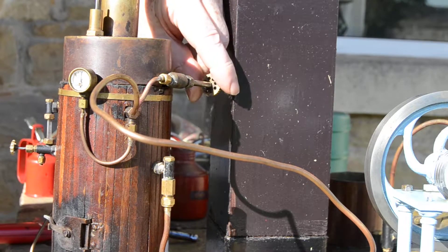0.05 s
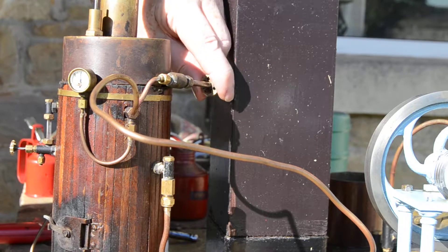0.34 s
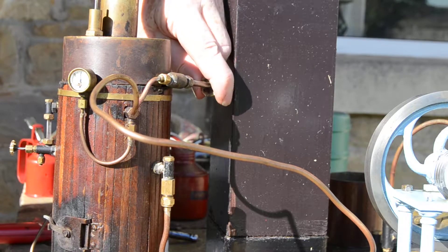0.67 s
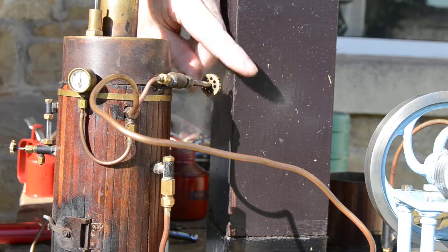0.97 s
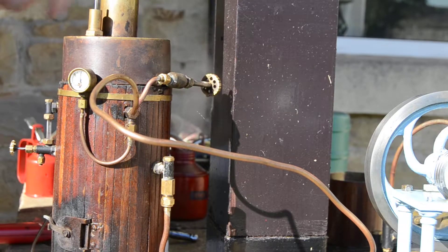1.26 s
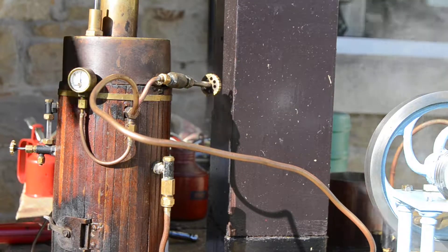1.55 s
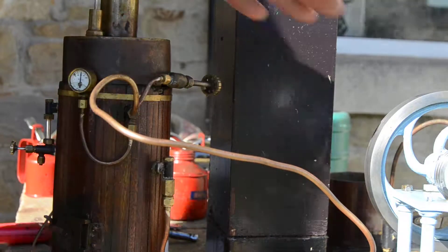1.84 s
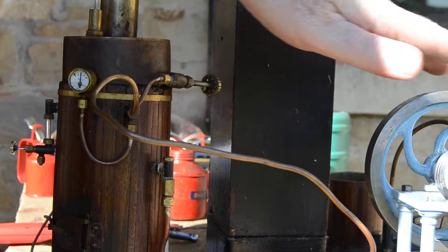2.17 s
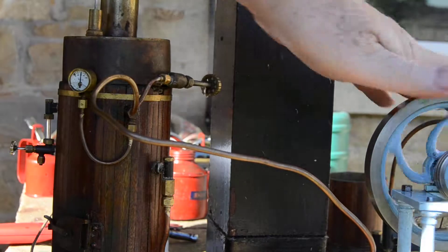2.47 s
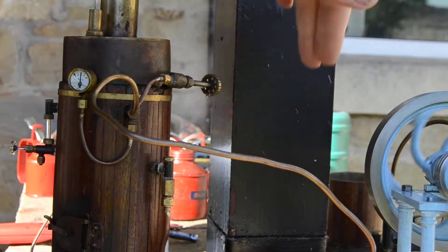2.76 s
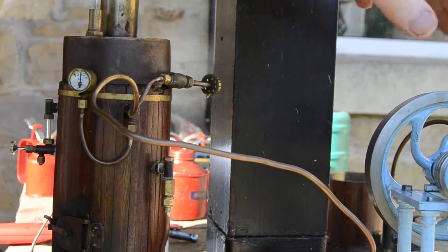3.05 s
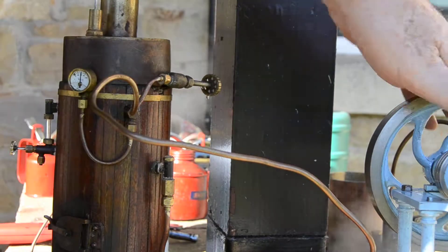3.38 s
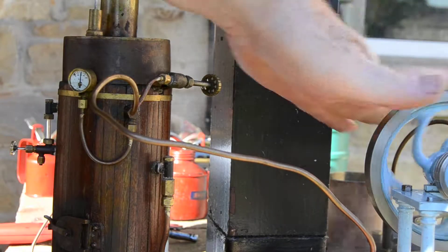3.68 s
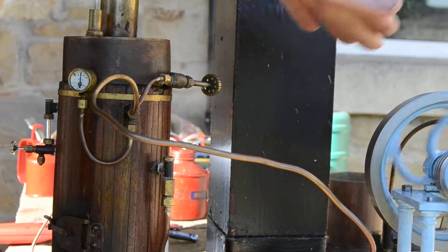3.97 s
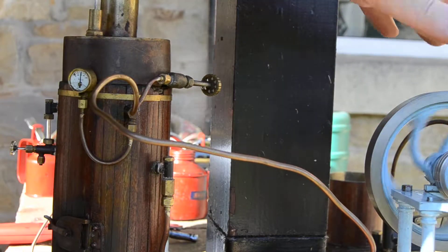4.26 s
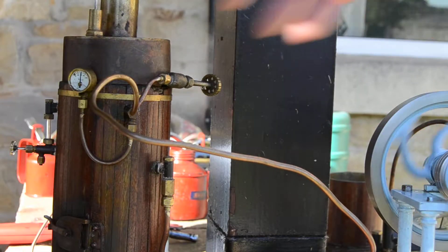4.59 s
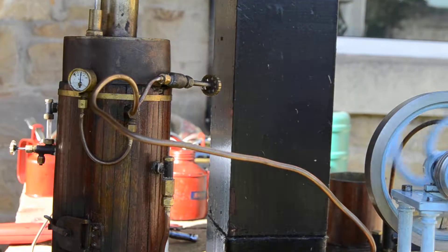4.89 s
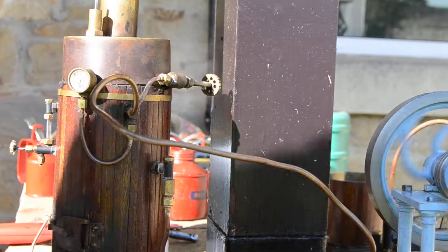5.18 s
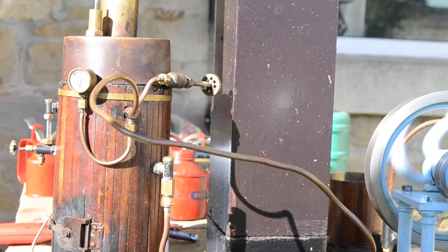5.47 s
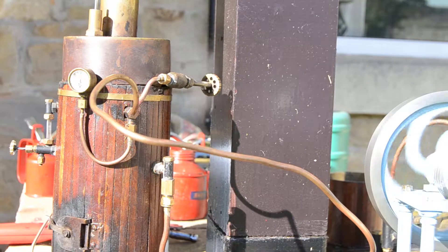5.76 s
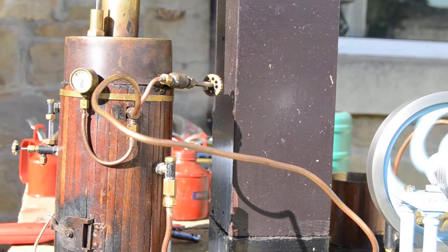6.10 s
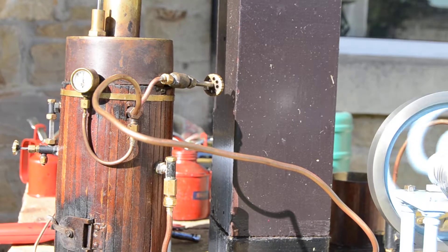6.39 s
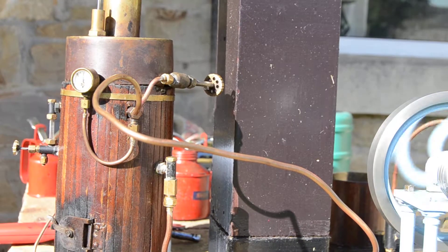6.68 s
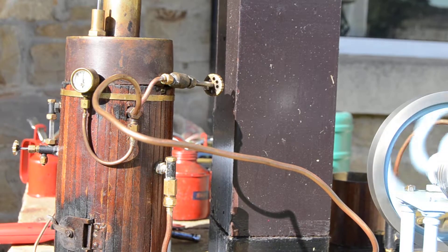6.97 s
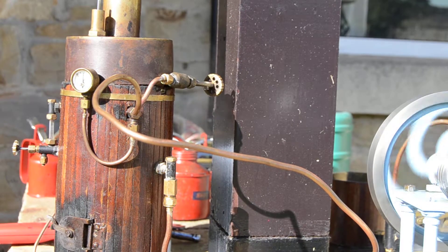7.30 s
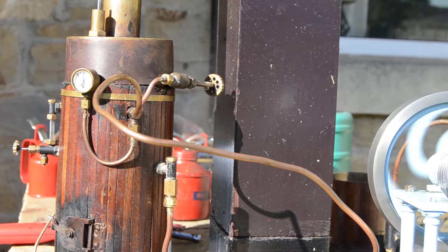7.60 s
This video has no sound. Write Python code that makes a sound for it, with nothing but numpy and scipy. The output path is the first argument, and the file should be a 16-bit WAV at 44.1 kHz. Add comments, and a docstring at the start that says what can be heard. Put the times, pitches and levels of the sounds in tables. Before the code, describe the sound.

Steam hisses from a small boiler valve, then a model steam engine gives two slow chuffs and speeds into quick, wet, spitting chuffing.

```python
"""A yard with a model steam engine, its gas burner hissing under a few low gusts of wind.
The valve squeaks open and wet steam blows through the standing cylinder. Two pushes on the flywheel
give two slow chuffs, then the engine picks up to about six turns a second, two chuffs a turn.
Each chuff is a puff of steam coloured by the exhaust pipe, where condensed water gurgles and spits."""
import sys
import numpy as np
from scipy import signal
from scipy.fft import rfft, irfft
from scipy.io import wavfile

SR = 44100
rng = np.random.default_rng(int(sys.argv[2]) if len(sys.argv) > 2 else 0)


def unload_audio(sound):
    """Save the sound as a 16-bit wav file, at the path given as the first command line argument."""
    columns = np.transpose(np.atleast_2d(sound))
    # keep every value between -1 and 1, then stretch to whole-number steps
    steps = np.round(np.clip(columns, -1, 1) * 32767)
    wavfile.write(sys.argv[1], SR, steps.astype(np.int16))


N = 345744
TIME = np.arange(N) / SR
EDGE_HZ = 11050  # top of the scene's band
CRACK_S, OPEN_S, SHUT_S = 0.561, 0.688, 2.522  # valve cracked, valve wide open, port shut by the wheel
STALL_S, START_S = 2.85, 3.68  # the engine stalls after the first push and starts on the second
CRUISE = 6  # turns a second

# tone of the wind, burner, gland leak, blow-through, spits and chuffs: f/Hz, level/dB
WIND_EQ = [(15, -14), (33, -4), (70, -3.5), (120, 0), (300, -2), (600, -2), (2000, -80)]
BURNER_EQ = [(20, -50), (60, -14), (130, -10.5), (230, -2), (1300, -3.5), (3000, -7), (6000, -6.5),
             (9000, -16.5), (11600, -3.5)]
LEAK_EQ = [(60, -28), (200, -17), (450, -1), (800, -12.5), (1300, -3), (2400, 1.5), (7400, -2), (9300, 2.5),
           (11400, -11)]
BLOW_EQ = [(60, -47), (200, -32), (420, -20), (900, -10.5), (2000, -7), (3500, -3.5), (5000, 3.5),
           (7500, 9), (10300, 0.5), (11500, 0.5)]
SPIT_EQ = [(60, -23), (200, -16), (450, -8.5), (900, -1), (2000, -1), (3200, 5), (4700, 6), (7000, 9),
           (9000, 5), (10300, -0.5), (11500, -0.5)]
CHUFF_EQ = [(60, -29), (150, -15), (330, 0.5), (640, 0.5), (1100, 5.5), (2000, 1), (4000, 3.5), (7500, 8.5),
            (10300, 1.5), (11500, -3)]
# peaks and notches on the burner and leak, in the exhaust pipe, on slow chuffs: f/Hz, width/Hz, gain/dB
FLUE_BANDS = [(1410, 200, 4.5), (2150, 560, 2), (3900, 350, -0.5), (4460, 480, 3.5), (7950, 420, -2.5),
              (9200, 900, 2)]
PIPE_BANDS = [(515, 103, 5.5), (1127, 490, 5), (2020, 580, 10), (2730, 425, 6.5), (3633, 554, 9),
              (4640, 900, 8.5), (5470, 380, 6), (6070, 200, 6), (6855, 500, 8.5), (8880, 160, -3.5),
              (8695, 510, 6.5), (9670, 540, 7.5), (10220, 310, 10)]
HOLLOW_BANDS = [(600, 250, 0), (1640, 180, -2.5), (4900, 280, -5), (6400, 240, -10), (10000, 500, -7)]
# ringing modes of the engine's metal: f/Hz
METAL_MODES = [843, 2039, 2274, 2735, 2957, 3544, 4248, 4608, 4886, 5102, 5564, 6821]
# peaks of the gusts: t/s, half width/s, level/dB
GUSTS = [(5.2, 0.27, -70), (5.77, 0.13, -70), (5.92, 0.041, -58), (6.11, 0.064, -57), (6.2, 1.5, -73)]
# water churning in the running engine: t/s, level/dB
CHURN_LEVEL = [(3.7, -64.5), (5.2, -54), (6, -59.5), (7.2, -54.5), (7.84, -77)]
# short watery splutters, plus one faint held tone near 1300 Hz: t/s, length/s, level/dB, f/Hz, width/Hz
SPLUTTERS_AND_TONE = [(0.708, 0.051, -43.5, 1600, 2200), (0.876, .012, -42, 4230, 1500),
                      (.925, .018, -46.5, 4500, 1400), (0.955, 0.022, -46, 3860, 1400),
                      (1.861, 0.0025, -38, 1900, 2200), (1.859, 0.055, -41.5, 1780, 1100),
                      (1.877, 0.026, -40.5, 4300, 1500), (2.183, 0.026, -48.5, 430, 690),
                      (2.246, 0.092, -46, 3640, 900), (2.427, 0.054, -48.5, 1010, 700),
                      (2.442, 0.079, -47.5, 1920, 700), (4.706, 0.014, -46, 2620, 300),
                      (5.103, 0.017, -42, 2070, 800), (5.246, 0.03, -45.5, 930, 700),
                      (5.436, .025, -47.5, 2000, 700), (5.508, 0.067, -45, 1020, 400),
                      (6.555, 0.028, -40.5, 960, 1300), (6.615, 0.035, -55, 527, 130),
                      (6.75, 0.039, -46.5, 740, 650), (6.82, 0.48, -61, 1301, 150),
                      (7.316, 0.031, -50, 517, 100), (7.327, .025, -38.5, 2930, 400)]
# slugs of water spat from the exhaust: t/s, length/s, level/dB
SPITS = [(3.82, .001, -41), (3.827, 0.0081, -37.5), (4.188, 0.0081, -43), (4.27, 0.0017, -32.5),
         (4.339, 0.0037, -41), (4.55, 0.0051, -31), (4.711, 0.006, -31), (4.785, 0.0013, -31),
         (4.936, 0.017, -31), (5.141, 0.012, -29.5), (5.192, .001, -39), (5.239, 0.0027, -39),
         (5.253, 0.0032, -35.5), (5.355, 0.0069, -28), (5.535, .002, -45), (5.558, 0.013, -32.5),
         (5.589, .001, -33.5), (5.738, 0.0069, -32), (5.781, 0.00088, -35), (5.943, 0.0061, -29.5),
         (6.002, 0.002, -35.5), (6.111, 0.012, -28), (6.309, 0.0077, -29), (6.472, 0.0082, -24),
         (6.513, .001, -33), (6.649, 0.026, -26.5), (6.835, 0.0031, -29.5), (7.164, 0.014, -28.5),
         (7.326, .015, -26), (7.494, 0.012, -32)]
# bright hiss of the blow-through, sagging where water chokes the pipe: t/s, level/dB
HISS_LEVEL = [(.7, -51), (.8, -49.5), (.9, -45), (1.2, -42), (1.5, -42), (1.75, -41.5), (2.0, -41.5),
              (2.24, -42.3), (2.32, -44.5), (2.42, -40.5), (2.52, -45.5)]
# one slow chuff for each push of the flywheel: t/s, length/s, level/dB
PUSHES = [(2.766, 0.097, -30.8), (3.694, 0.078, -32.5)]
# return chuffs that water in the cold cylinder holds back until they burst out: t/s, level/dB
WET_CHUFFS = [(3.945, -34.5), (4.27, -45.5), (4.545, -35), (4.777, -36), (5, -36), (5.433, -40),
              (5.818, -38), (5.999, -35.5)]
# run-up of the crank: t/s, speed/(turns a second)
CRANK_SPEED = [(3.693, 2.093), (4.2, 3.268), (4.7, 4.199), (5.3, 4.929), (6.3, 5.59), (7.84, 6.365)]


def amp(db):
    return 10 ** (np.asarray(db) / 20)


def unit_rms(x):
    return x / np.sqrt(np.mean(x ** 2) + 1e-20)


def follow(curve):
    """A breakpoint curve at every sample."""
    return np.interp(TIME, *np.transpose(curve))


def add(mix, s, sound):
    """Lays a sound into the mix at s seconds."""
    part = mix[max(round(s * SR), 0):][:len(sound)]
    part += sound[:len(part)]


def held(start, stop, rise, fall, t=TIME):
    """Attack, hold and release of a steady flow, in seconds."""
    attack = np.sin(np.pi / 2 * np.clip((t - start) / rise, 0, 1)) ** 2
    return attack * np.exp(-np.maximum(t - stop, 0) / fall)


def puff(length, rise, fall):
    """One-shot envelope: a port opens, stays open, and the pressure dies away."""
    return held(0, length, rise, fall, TIME[:SR // 4])


def wander(rate_hz):
    """Smooth random modulation at unit rms."""
    hz = np.fft.rfftfreq(N, 1 / SR)
    return unit_rms(irfft(rfft(rng.standard_normal(N)) * np.exp(-(hz / rate_hz) ** 2), N))


def colour(x, eq, bands=(), depth=1, size=4096):
    """Minimum-phase EQ of unit in-band power: a smooth curve plus peaks and notches."""
    hz = abs(np.fft.fftfreq(size, 1 / SR))
    eq_hz, eq_db = np.transpose(eq)
    db = np.interp(np.log(hz + 1), np.log(eq_hz), eq_db)
    for centre, width, gain in bands:
        db += depth * gain / (1 + (2 * (hz - centre) / width) ** 4)
    response = np.exp(np.conj(signal.hilbert(np.log(amp(db)))))
    band_rms = np.sqrt(np.mean(amp(db) ** 2 * (hz < EDGE_HZ)))
    return signal.oaconvolve(x, np.fft.ifft(response).real / band_rms)[:len(x)]


def tilt(x, slope_db, pivot_hz=5000):
    """Brightens or dulls by slope_db an octave above 500 Hz."""
    hz = np.fft.rfftfreq(len(x), 1 / SR)
    return irfft(rfft(x) * amp(slope_db * np.log2(np.maximum(hz, 500) / pivot_hz)), len(x))


def resonate(x, hz, width_hz):
    """A steep resonance at unit rms; its pitch may glide."""
    carrier = np.exp(2j * np.pi * np.cumsum(hz * np.ones(len(x))) / SR)
    pole = np.exp(-np.pi * width_hz / SR)
    baseband = signal.lfilter([1], [1, -2 * pole, pole * pole], np.gradient(x) / carrier)
    return unit_rms((carrier * baseband).real)


def swirl(x, patch_db, patch_hz, patch_s, size=512):
    """Moving water keeps shifting a jet's colour, in patches of time and frequency."""
    hop = size // 4
    frames = signal.stft(x, SR, nperseg=size, noverlap=size - hop)[2]
    across = np.fft.fftfreq(len(frames), SR / size)[:, None]
    along = np.fft.fftfreq(frames.shape[1], hop / SR)
    blur = np.exp(-(across * patch_hz) ** 2 - (along * patch_s) ** 2)
    patches = unit_rms(np.fft.ifft2(np.fft.fft2(rng.standard_normal(frames.shape)) * blur).real)
    frames *= amp(patch_db * patches)
    return unit_rms(signal.istft(frames, SR, nperseg=size, noverlap=size - hop)[1][:N])


def wet_steam(flutter_db, flutter_hz, drops_db, drops_per_s):
    """A fluttering jet that carries bursting droplets."""
    jet = rng.standard_normal(N) * amp(flutter_db * wander(flutter_hz))
    drops = rng.standard_normal(N) * (rng.random(N) < drops_per_s / SR)
    return unit_rms(unit_rms(jet) + amp(drops_db) * unit_rms(drops))


def speed_at(s):
    """Crank turns a second; zero before the run-up."""
    return np.interp(s, *np.transpose(CRANK_SPEED), left=0)


def crank_turns():
    """Start time and speed of each turn."""
    turned = np.cumsum(speed_at(TIME)) / SR
    starts = TIME[np.searchsorted(turned, np.arange(np.ceil(turned[-1])), side="right")]
    return list(zip(starts, speed_at(starts)))


def wind(breeze_db=-99):
    """A bed of lumpy low rumble that swells with each gust."""
    lumps = unit_rms(rng.standard_normal(N) * amp(2 * wander(8.4)))
    gusts = sum(amp(db) * np.exp(-((TIME - s) / width) ** 2) for s, width, db in GUSTS)
    return (amp(breeze_db) + gusts) * colour(lumps, WIND_EQ)


def yard_echoes(x, t60=0.14, echoes_per_s=2000):
    """Short, sparse reflections off the bench and the walls."""
    t = TIME[:SR // 2]
    taps = rng.choice([-1, 1], len(t)) * (rng.random(len(t)) < echoes_per_s / SR)
    taps = taps * (t > .004) * amp(-60 * t / t60)
    return signal.oaconvolve(x, taps / np.linalg.norm(taps))[:N]


def metal_ring(x, t60=.13):
    """The exhaust sets the engine's metal ringing."""
    t = TIME[:SR // 4]
    modes = amp(-60 * t / t60) * sum(np.sin(2 * np.pi * hz * t) for hz in METAL_MODES)
    return signal.oaconvolve(x, modes / np.linalg.norm(modes))[:N]


def burner(level_db=-57.5):
    """The steady breath of the gas flame."""
    return amp(level_db) * colour(rng.standard_normal(N), BURNER_EQ, FLUE_BANDS + [(7700, 1600, -3)])


def gland_leak(idle_db=-58.5, open_db=-52.5, blowing_db=-55, stalled_db=-48, running_db=-54.5):
    """Thin hiss from the glands, strongest as pressure builds behind the stalled piston."""
    hiss = swirl(rng.standard_normal(N), patch_db=1.5, patch_hz=400, patch_s=0.061)
    flows = [amp(idle_db) * np.ones(N),
             amp(open_db) * (TIME > CRACK_S),
             amp(blowing_db) * held(CRACK_S, SHUT_S, rise=0.15, fall=0.027),
             amp(stalled_db) * held(STALL_S, START_S, rise=0.59, fall=0.091),
             amp(running_db) * (speed_at(TIME) / CRUISE) ** 3]
    return np.linalg.norm(flows, axis=0) * colour(hiss, LEAK_EQ, FLUE_BANDS)


def base_thumps(hum_hz=174, body_hz=400, sag=.07, rough=0.33, length_s=.11, lead_s=0.058, level_db=-61.5):
    """The base gives a rough hum once a turn as the piston reverses, growing as the crank speeds up."""
    swell, load = np.hanning(round(length_s * SR)), np.zeros(N)
    for s, speed in crank_turns():
        add(load, s - lead_s, min(speed / 5.06, 1) ** 2 * swell)
    phase = 2 * np.pi * np.cumsum(hum_hz * (1 - sag * (1 - load))) / SR
    hum = np.sin(phase + rough * wander(45)) * (1 + rough * wander(53))
    body = wander(130) * np.sin(2 * np.pi * body_hz * TIME)
    return amp(level_db + 2.3 * wander(14)) * load * (hum + amp(-3) * body)


def valve_squeak(start_s=.38, length_s=0.2, from_hz=1400, to_hz=720, level_db=-61):
    """The spindle rubs in its packing: a faint, scratchy falling note."""
    progress = np.clip((TIME - start_s) / length_s, 0, 1)
    hz = from_hz * (to_hz / from_hz) ** progress
    swell = np.sqrt(2 * abs(np.sin(np.pi * progress)))
    return amp(level_db) * swell * wander(190) * np.sin(2 * np.pi * np.cumsum(hz) / SR)


def valve_crack(tick_db=-44, squeak_db=-53):
    """The valve comes off its seat with a crisp tick and a brief squeak."""
    out, t = np.zeros(N), TIME[:SR // 4]
    tick = resonate(rng.standard_normal(len(t)), hz=4500, width_hz=6000) * np.exp(-t / 0.0016)
    squeak = resonate(rng.standard_normal(len(t)), hz=2720, width_hz=170) * np.exp(-t / 0.037)
    add(out, CRACK_S, amp(tick_db) * tick + amp(squeak_db) * squeak)
    return out


def bubbles(centre_hz, count, spread=0.358, ring_cycles=3.5):
    """A bed of small bubbles, each swelling within a cycle and ringing for a few more."""
    t, out = TIME[:1024], np.zeros(N + 1024)
    for when, pitch, strength in rng.random((count, 3)):
        cycles = t * centre_hz * np.exp(spread * np.sqrt(2) * np.arcsin(2 * pitch - 1))
        envelope = (1 - np.exp(-cycles)) * np.exp(-2 * cycles / ring_cycles)
        pressure = np.diff(np.sin(2 * np.pi * cycles) * envelope)
        add(out, when * N / SR, (0.093 + strength ** 2) * pressure / abs(pressure).max())
    return unit_rms(out)[:N]


def gurgles(surge_db=1.3, waver=0.0082):
    """Short watery splutters and one faint held tone, over a churn that comes up once the engine runs."""
    out = bubbles(centre_hz=1300, count=5500) * amp(follow(CHURN_LEVEL) + surge_db * wander(12))
    spray = wet_steam(flutter_db=3.5, flutter_hz=200, drops_db=2, drops_per_s=900)
    bend = 1 + waver * wander(30)
    for s, length, db, hz, width in SPLUTTERS_AND_TONE:
        part = slice(round(s * SR), round(s * SR) + SR // 2)
        band = resonate(spray[part], hz * bend[part], width)
        add(out, s, amp(db) * band * held(s, s + length, rise=length / 4, fall=0.01)[part])
    return out


def spits(sizzle_db=-14, long_slug_s=0.0067, trail_turns=.21, soft_hz=7500):
    """Slugs of water tear into pops; small ones are duller, long ones leave a tail of sizzle."""
    out, t = np.zeros(N), TIME[:SR // 4]
    spray = wet_steam(flutter_db=1, flutter_hz=320, drops_db=-2.5, drops_per_s=2500)
    spray = swirl(spray, patch_db=3, patch_hz=885, patch_s=0.014)
    # a spit trails each wet chuff; slower turns gather more water
    trailing = [(s + trail_turns / speed_at(s), 0.00082 * (CRUISE / speed_at(s)) ** 3.65, db - 1)
                for s, db in WET_CHUFFS]
    for s, length, db in SPITS + trailing:
        burst = puff(length, rise=0.0006, fall=0.0032) * np.exp(-t / 0.034)  # hardest at the start
        pops = np.resize(spray[round(s * SR):][:len(t)], len(t))
        bulk = min(length / long_slug_s, 1)
        crack = pops * burst * np.linalg.norm(burst) / np.linalg.norm(pops * burst)
        crack = tilt(crack, slope_db=-0.84 - 3 * (1 - bulk))
        sizzle = amp(sizzle_db) * bulk * pops * puff(length, rise=0.0047, fall=0.044)
        add(out, s, amp(db) * (crack + tilt(sizzle, slope_db=-3, pivot_hz=4050)))
    warm = np.interp(TIME, [6.5, 7.1], [0, 1])  # the last slugs, from the warm cylinder, spray less
    softened = signal.sosfilt(signal.butter(3, soft_hz, fs=SR, output="sos"), out)
    return colour((1 - warm) * out + warm * softened, SPIT_EQ, PIPE_BANDS)


def blow_through(rush_db=-50, rebound_db=-36.5):
    """The cracked valve gives a wet rush; wide open, it adds a bright hiss that grows as the steam dries."""
    jet = wet_steam(flutter_db=1, flutter_hz=130, drops_db=-14, drops_per_s=500)
    jet = swirl(jet, patch_db=1.27, patch_hz=900, patch_s=0.052)
    jet = colour(jet, BLOW_EQ, PIPE_BANDS + [(6380, 110, 3), (7400, 250, -1.5)], depth=0.97)
    surge = np.interp(TIME, [OPEN_S, .75, 1.3, 2.1], [0.71, 1.3, 0.81, 0.6])
    rush = amp(rush_db) * held(CRACK_S, SHUT_S, rise=0.013, fall=0.33) * surge
    hiss = amp(follow(HISS_LEVEL)) * held(OPEN_S, SHUT_S, rise=.04, fall=0.0058)
    # after the first push the wheel rocks back and lets out a short, bright puff
    rebound = amp(rebound_db) * held(2.897, 2.908, rise=.007, fall=.008)
    return (hiss + rebound) * jet + rush * tilt(jet, slope_db=-9.5, pivot_hz=3040)


def pushed_chuffs(flutter_db=1.2):
    """Turned by hand, the port opens and closes slowly: a smooth swell of steam rings the hollow pipe."""
    flow = sum(amp(db) * abs(np.sin(np.pi * np.clip((TIME - s) / length, 0, 1))) ** 0.36
               for s, length, db in PUSHES)
    jet = rng.standard_normal(N) * amp(flutter_db * wander(250))
    notches = HOLLOW_BANDS + [(510, 260, -6.5), (5500, 400, -2.5), (9000, 2000, -2)]
    return colour(flow * jet, CHUFF_EQ, PIPE_BANDS + notches, depth=1.25)


def wet_bursts(open_turns=0.15, ragged_db=2):
    """Ragged envelope of the return chuffs that burst through water."""
    flow, sag = np.zeros(N), np.exp(-TIME[:SR // 4] / 0.12)
    for s, db in WET_CHUFFS:
        add(flow, s, amp(db) * puff(open_turns / speed_at(s), rise=0.0035, fall=0.0084) * sag)
    return flow * amp(ragged_db * wander(110))


def running_chuffs(main_turns=0.14, return_turns=0.33, offbeat_turns=0.4, lead_s=0.0018):
    """Each end of the cylinder vents once a turn: full and hollow at first, thinner at speed."""
    flow = np.zeros(N)
    for s, speed in crank_turns()[1:]:  # the first turn opens with a pushed chuff
        doublings = np.log2(speed / CRUISE)
        main = amp(-36.5 - 1.4 * doublings) * puff(main_turns / speed, rise=0.011, fall=0.011)
        soft_return = amp(-44 + 18 * doublings) * puff(return_turns / speed, rise=0.004, fall=0.0048)
        add(flow, s - lead_s, main)
        add(flow, s + offbeat_turns / speed, soft_return)
    flow += wet_bursts()
    jet = wet_steam(flutter_db=3, flutter_hz=400, drops_db=-8.5, drops_per_s=1000)
    steam = flow * swirl(jet, patch_db=1.7, patch_hz=493, patch_s=0.031)
    full = colour(steam, CHUFF_EQ, PIPE_BANDS + HOLLOW_BANDS, depth=0.81)
    thin = colour(steam, CHUFF_EQ, PIPE_BANDS + [(3480, 2630, -6.5)], depth=1.03)
    crossfade = np.interp(TIME, [3.9, 5.2], [0, 1])
    return (1 - crossfade) * full + crossfade * thin


def scene():
    """Mono mix: the exhaust rings the metal and echoes in the yard; the other layers stay dry."""
    exhaust = blow_through() + pushed_chuffs() + running_chuffs() + spits() + gurgles()
    exhaust += amp(-23.5) * metal_ring(exhaust)
    exhaust += amp(-8) * yard_echoes(exhaust)
    backing = gland_leak() + burner() + valve_crack() + valve_squeak() + base_thumps() + wind()
    return (exhaust + backing)[None]


def record(dry):
    """A steep high cut takes the air off the top."""
    high_cut = signal.firwin(121, EDGE_HZ, window=("kaiser", 8), fs=SR)
    return signal.oaconvolve(dry, high_cut[None], "same")


dry = scene()
out = record(dry)
unload_audio(out)
```